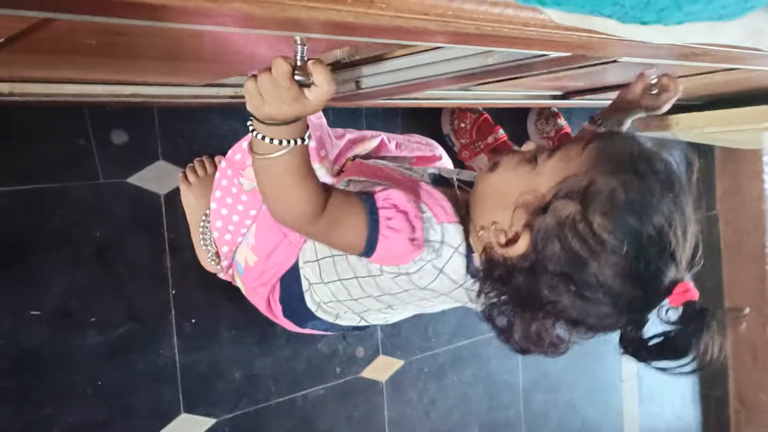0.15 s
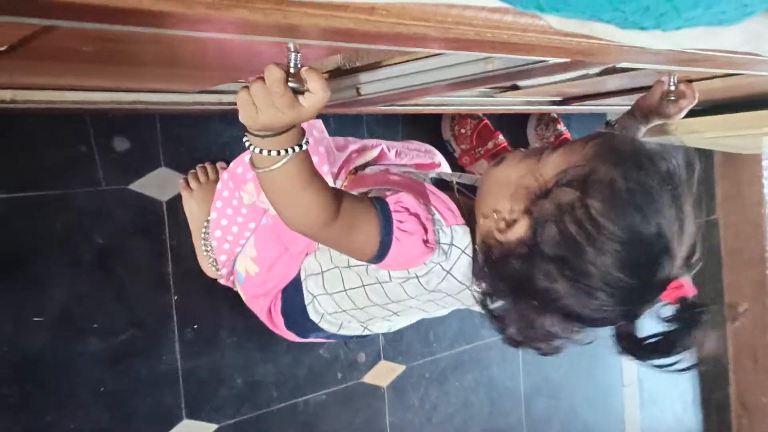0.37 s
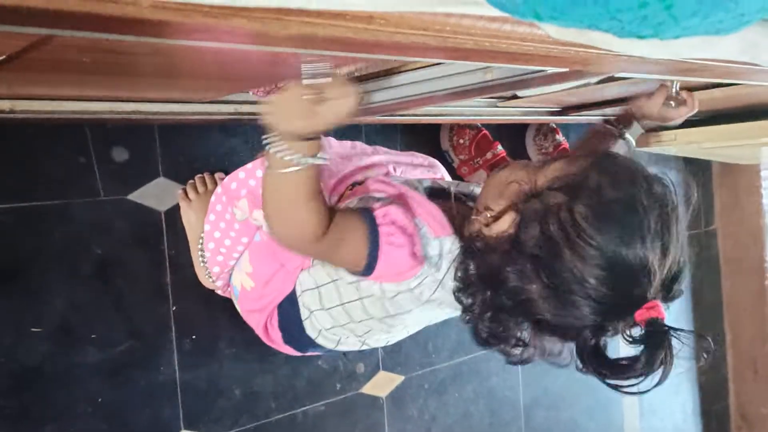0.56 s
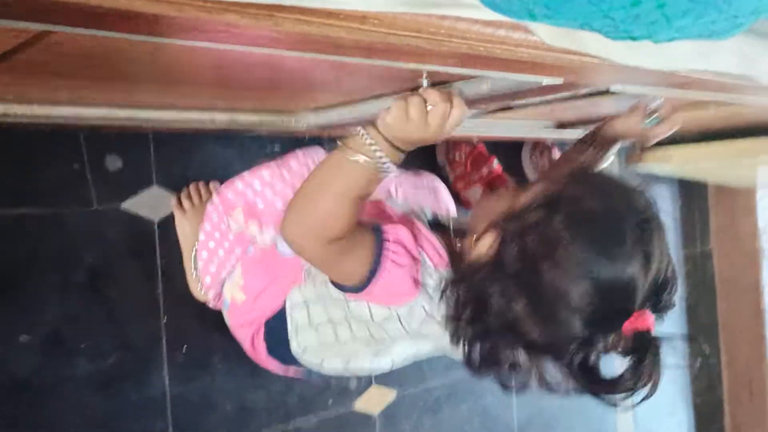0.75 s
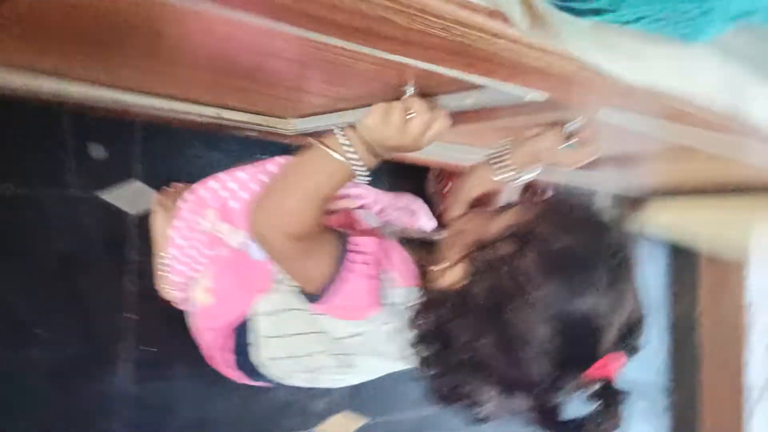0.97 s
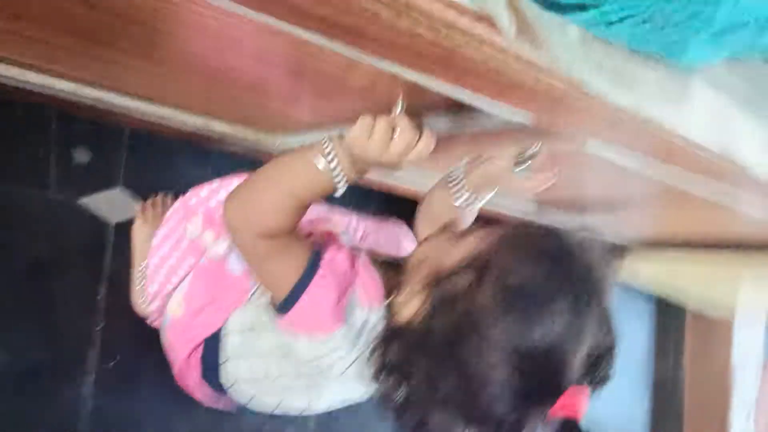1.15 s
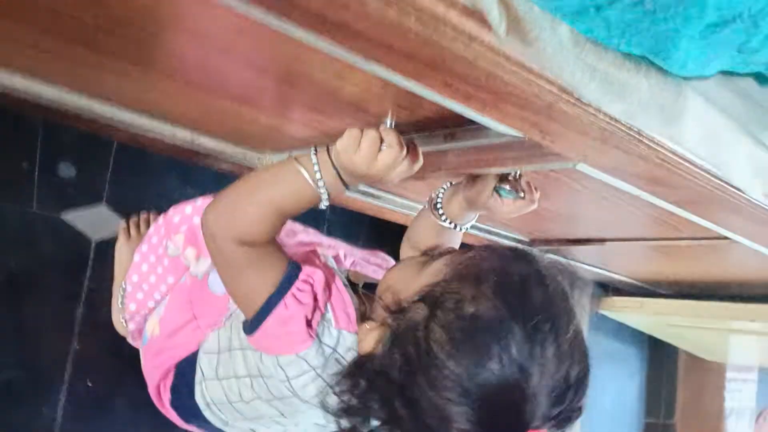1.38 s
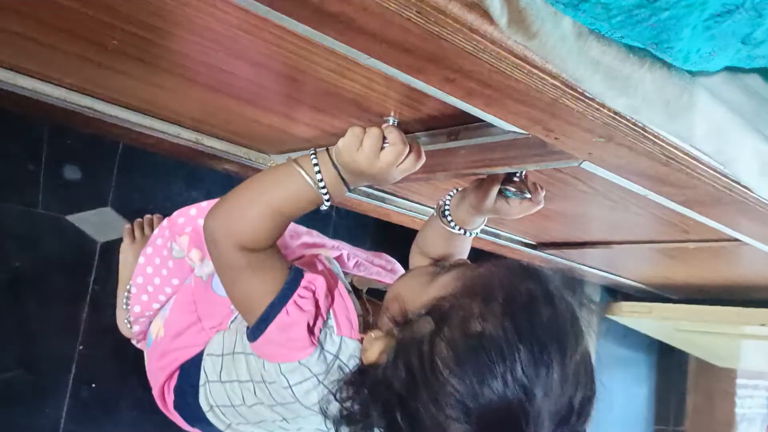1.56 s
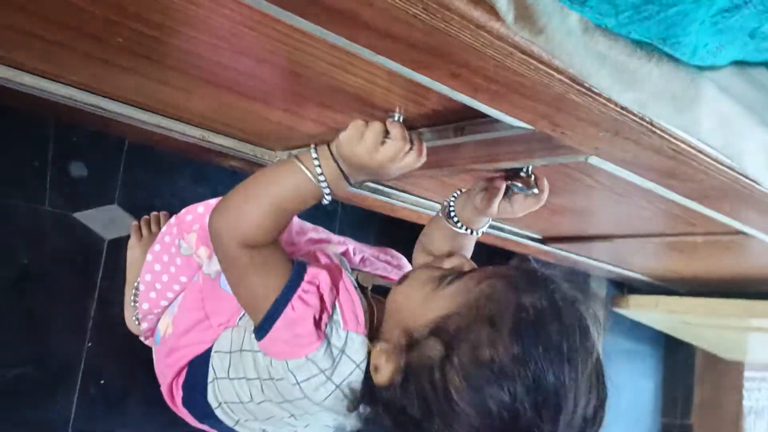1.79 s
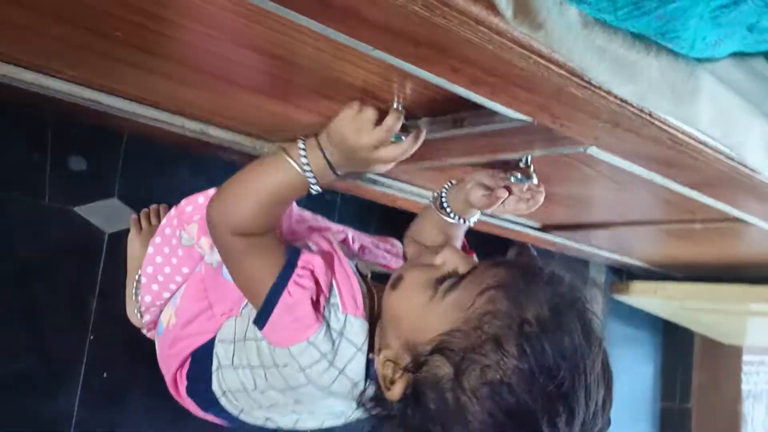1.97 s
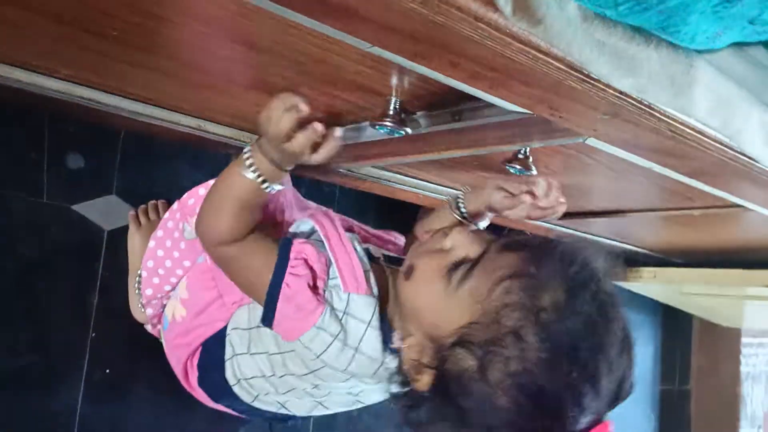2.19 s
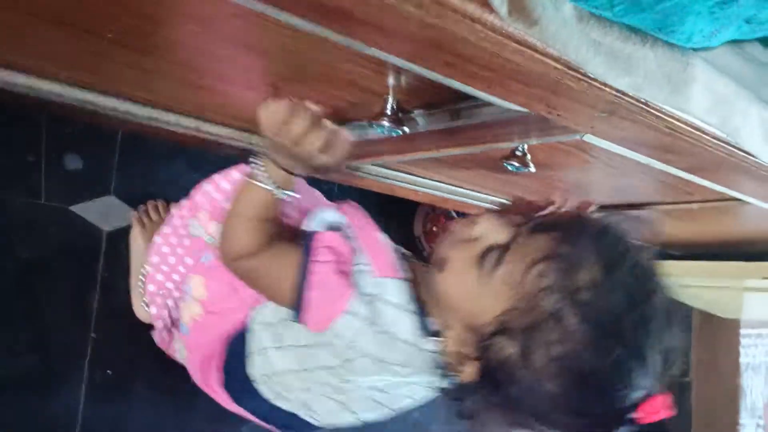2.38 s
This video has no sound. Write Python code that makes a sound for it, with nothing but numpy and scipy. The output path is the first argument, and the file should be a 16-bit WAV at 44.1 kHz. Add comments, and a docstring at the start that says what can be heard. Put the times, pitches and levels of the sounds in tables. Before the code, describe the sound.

Close stereo sound of a small wooden drawer being tugged: a low rumbling rub, a lull, a sudden gritty scrape and clack, a woody thud on the stop, then faint knocks and short tiled-room reverberation.

```python
"""A low rumble and a woody, sandy rasp: a wooden drawer is tugged to and fro in its runners in a tiled room.
Stick-slip friction noise drives the box's low modes, the wood's rasp, the grit and a hissing runner.
Short noise cracks mark catches in the slide; the front, a struck resonator, knocks lightly on its stop.
The cabinet's panels hum as narrow noise bands; cloth brushes softly in swells of hiss over a quiet room floor."""
import sys
import numpy as np
from scipy import signal
from scipy.fft import rfft, irfft, next_fast_len
from scipy.io import wavfile
from scipy.ndimage import map_coordinates

SR = 44100
rng = np.random.default_rng(int(sys.argv[2]) if len(sys.argv) > 2 else 0)


def inscribe(sig):
    """Save sig as 16-bit PCM at rate SR to the path in sys.argv[1].

    A 1-D sig is mono; a 2-D sig holds one channel per row.
    Samples are clipped to [-1, 1] before scaling.
    """
    pcm = np.round(np.clip(np.atleast_2d(sig).T, -1, 1) * 32767)
    wavfile.write(sys.argv[1], SR, pcm.astype(np.int16))


N = 107868
TIME = np.arange(N) / SR


def amp(db):
    """Decibel law: a level in dB as an amplitude ratio."""
    return 10 ** (np.asarray(db) / 20)


def unit(x):
    """Normalisation: the signal at rms 1."""
    return x / np.sqrt(np.mean(x ** 2) + 1e-20)


def along(points, hz):
    """Interpolation of (frequency_hz, value) points on a logarithmic frequency axis."""
    point_hz, value = np.transpose(points)
    return np.interp(np.log(hz + 1), np.log(point_hz + 1), value)


def wobble(rate):
    """Slow random modulation: a smooth curve through rate random knots a second."""
    knots = rng.standard_normal(int(N * rate / SR) + 4)
    return map_coordinates(knots, [TIME * rate])


def filtered(x, response):
    """Linear filtering: the spectrum times a complex response of frequency."""
    m = next_fast_len(x.shape[-1] + SR // 2)  # padding leaves room for the ringing
    spectrum = rfft(x, m) * response(np.fft.rfftfreq(m, 1 / SR))
    return irfft(spectrum, m)[..., :x.shape[-1]]


def peak(f, hz, width):
    """Resonance: the band-pass response of one damped mode."""
    return 1j * f * width / (hz * hz - f * f + 1j * f * width)


def modes(f, table, sign=-1):
    """Modal superposition: mode k is weighted by sign ** k, so rubbed modes alternate in polarity."""
    return sum(sign ** k * amp(db) * peak(f, hz, width) for k, (hz, width, db) in enumerate(table))


# Left-right correlation of the sound field: frequency_hz, correlation (-1 to 1)
LIKENESS = [(30, -0.6), (60, 0.96), (125, 0.97), (400, 0.87), (800, .6), (1400, .1), (3000, -.1),
            (12000, 0)]


def spread(pair, colour):
    """Interaural correlation: two signals, coloured and mixed as mid and side into stereo of rms 1."""
    def mid_side(hz):
        angle = np.arccos(np.clip(along(LIKENESS, hz), -1, 1)) / 2
        return colour(hz) * [np.cos(angle), np.sin(angle)]

    mid, side = filtered(pair, mid_side)
    return unit(np.array([mid + side, mid - side]))


SLIPS_PER_S, SLIP_SPREAD_DB = 500, 0.5


def friction(share):
    """Stick-slip: smooth rubbing noise, a share of it modulated by short irregular slips."""
    slips = (rng.random(N) < SLIPS_PER_S / SR) * amp(SLIP_SPREAD_DB * rng.exponential(size=N))
    bursts = unit(signal.lfilter([1], [1, -.97], slips))  # each slip dies within a few ms
    return rng.standard_normal((2, N)) * (1 - share + share * bursts)


# Levels of the rubbing layers: start_s, box_rumble_db, low_rasp_db, high_rasp_db, grit_db, fine_hiss_db,
# runner_ring_db
SLIDE = [(0.0, -24, -35, -31.5, -29.5, -37, -49.5), (0.034, -41.5, -36.5, -33, -32.5, -41, -45),
         (0.07, -32, -32.5, -36.5, -37, -42.5, -47), (0.146, -37.5, -51, -50, -50, -54.5, -61),
         (0.16, -39.5, -44.5, -53.5, -54.5, -60.5, -65), (0.196, -54, -51.5, -55.5, -59, -65, -70),
         (0.242, -47.5, -44, -48.5, -48, -58, -59), (0.282, -50.5, -52, -54, -55.5, -52.5, -67.5),
         (0.344, -49, -53, -52, -47, -52, -58.5), (0.356, -50, -44, -48.5, -48.5, -50.5, -57),
         (0.428, -45, -49.5, -50.5, -55.5, -54.5, -69), (0.486, -56.5, -58, -63.5, -56.5, -51, -60),
         (0.534, -65.5, -74, -70, -63.5, -58.5, -73), (0.592, -65, -64, -65.5, -64, -64, -75.5),
         (0.6, -32, -66.5, -60, -48, -55.5, -65), (0.616, -72, -57, -53, -54, -53.5, -58.5),
         (0.644, -31, -40.5, -42.5, -45.5, -45, -51), (0.67, -30, -39, -36, -35.5, -48.5, -42),
         (0.684, -32, -30, -35, -32, -42.5, -48.5), (0.756, -27, -30.5, -25.5, -28, -34, -42),
         (0.766, -32, -22.5, -21, -24.5, -24, -37), (0.784, -30.5, -29, -28.5, -38, -30.5, -38.5),
         (0.79, -24, -19, -22, -25.5, -34.5, -17), (0.8, -27, -40, -37.5, -27, -31, -30.5),
         (0.818, -27, -38, -31, -21, -24, -21), (0.916, -46, -46, -47.5, -42.5, -47, -43),
         (0.984, -44, -54.5, -50.5, -51, -55.5, -58), (1.052, -59.5, -64, -52.5, -45, -49, -56.5),
         (1.196, -53.5, -39, -43.5, -41.5, -44.5, -74.5), (1.225, -54, -63, -42, -38, -42, -62.5)]
# Modes of the drawer box, also struck by the knocks: pitch_hz, width_hz, relative level_db
BOX = [(137.2, 17, -16.5), (208, 22, 0.5), (250.3, 29, -5.5), (317.3, 41, -3.5), (407, 40, -5.5),
       (478, 130, -12), (572, 76, -11.5), (681.4, 25, -11.5), (790, 110, -8), (924, 190, -12),
       (1140, 380, -17), (1340, 130, -9), (1720, 92, -21.5), (1910, 840, -7), (2261, 320, 5.5),
       (3250, 730, -20.5)]
# Modes of the runner: pitch_hz, width_hz, relative level_db
RUNNER = [(4690, 96, -10), (5130, 130, -11.5), (5225, 300, -10.5), (5760, 130, -14)]
# Relative noise spectra of wood surface (low and high rasp), dust and fine hiss: frequency_hz, density_db (per Hz)
LOW_RASP = [(260, -33.5), (450, -7.5), (553, -8.5), (692, -9.5), (748, -6), (994, -15), (1100, -14),
            (1430, -44), (2420, -120)]
HIGH_RASP = [(650, -35.5), (1100, -8.5), (1340, -2.5), (1650, -5.5), (1730, -3), (2070, 0.5), (3200, -7.5),
             (4160, -34), (7040, -120)]
GRIT = [(1880, -25.5), (3200, -6.5), (3390, -8), (5010, -8.5), (5580, -8), (6190, -8.5), (7500, -12.5),
        (9750, -53.5), (16500, -120)]
HISS = [(4410, -41), (7500, -4.5), (8000, 2.5), (9550, 0), (10100, -5), (12000, -2), (15600, -15.5)]
STOP_FADE_DB_PER_S = 493  # after the last point
JUDDER_DB = 0.5  # unevenness shared by all layers
SLIP_SHARES = [.31, .31, .31, .4, .3, .4]  # in the order of the level columns


def slide():
    """Source-filter principle: friction heard through the box, the wood's surface, the dust and the runner."""
    def box_colour(hz):
        low_pass = 1 / (1 + (hz / 480) ** 6)
        high_pass = 1 / (1 + (160 / (hz + 1)) ** 6)
        return modes(hz, BOX) * low_pass * high_pass

    colours = [box_colour]
    colours += [lambda hz, p=p: amp(along(p, hz)) for p in (LOW_RASP, HIGH_RASP, GRIT, HISS)]
    colours += [lambda hz: modes(hz, RUNNER)]
    start_s, *levels_db = np.transpose(SLIDE)
    fade_db = -STOP_FADE_DB_PER_S * np.maximum(TIME - start_s[-1], 0)
    judder_db = JUDDER_DB * wobble(70.55)
    out = np.zeros((2, N))
    for level_db, colour, share in zip(levels_db, colours, SLIP_SHARES):
        envelope = amp(np.interp(TIME, start_s, level_db) + fade_db + judder_db)
        out += envelope * spread(friction(share), colour)
    return out


CRACK_WIDTH = 1.3  # bandwidth over centre, for snaps and knock clicks
SNAP_RISE_S = 0.0018
# Catches in the runner: start_s, peak level_db, centre_hz, t60_s
SNAPS = [(0.2327, -37.5, 3000, 0.0081), (0.346, -31, 8806, 0.011), (0.599, -30.5, 7900, 0.015),
         (0.6303, -28.5, 6847, 0.025), (0.664, -21, 4510, .012), (0.7652, -6.5, 2590, 0.033),
         (0.7897, -1.5, 4200, 0.014), (1.145, -31, 10000, 0.012)]


def snaps():
    """Sudden release: short band-passed noise cracks where the runner catches and lets go."""
    out, t = np.zeros((2, N + SR)), np.arange(SR // 10) / SR
    for start_s, level_db, centre_hz, t60_s in SNAPS:
        decay = amp(-60 * t / t60_s) * (1 - np.exp(-t / SNAP_RISE_S))
        crack = rng.standard_normal((2, len(t))) * decay
        crack = filtered(crack, lambda f: peak(f, centre_hz, centre_hz * CRACK_WIDTH) ** 2)
        out[:, round(start_s * SR):][:, :len(t)] += amp(level_db) * crack / np.abs(crack).max()
    return out[:, :N]


PUSH_S, RATTLE_T60_S, RATTLE_DB = .002, 0.17, -24.5
FRONT_T60_S, FRONT_RISE_S = 0.089, .002
CLICK_T60_S, CLICK_RISE_S = 0.08, .0005
REBOUND_S, REBOUND_DB = 0.017, -9.5  # the front touches once more
# Knocks on the stop: start_s, box ring peak level_db, low_cut_hz, high_cut_hz, click_db, click_hz,
# front board pitch_hz, front_db (click and front relative to the ring's peak, before their envelopes)
KNOCKS = [(1.2363, -16.5, 231, 930, -6, 2000, 324, -6), (1.624, -35.5, 150, 690, -14.5, 1363, 378.4, -6),
          (2.0164, -35, 241, 870, -6.5, 2860, 342, -2.5), (2.1744, -46.5, 220, 600, -16, 1700, 335, -2.5),
          (2.2797, -45.5, 215, 586, -20, 1800, 344.5, -0.5), (2.436, -71.5, 100, 299, -35, 1800, 299, -10)]


def knocks():
    """Impact excitation: a push and a dying rattle ring the box, with a front-board tone and a click."""
    out, t = np.zeros((2, N + SR)), np.arange(SR // 2) / SR
    for start_s, level_db, low_hz, high_hz, click_db, click_hz, front_hz, front_db in KNOCKS:
        noise = rng.standard_normal((4, len(t)))
        push = 0.46 * noise[0] * (t / PUSH_S) * np.exp(-t / PUSH_S)
        rattle = amp(RATTLE_DB - 60 * t / RATTLE_T60_S) * noise[1]

        def struck_box(f):
            high_pass = 1 / (1 + (low_hz / (f + 1)) ** 3)
            low_pass = 1 / (1 + (f / high_hz) ** 3)  # softer contacts leave out the high modes
            return modes(f, BOX, sign=0.96) * high_pass * low_pass  # struck modes start in step

        ring = filtered(push + rattle, struck_box)
        front_envelope = amp(front_db - 60 * t / FRONT_T60_S) * (1 - np.exp(-t / FRONT_RISE_S))
        front = front_envelope * np.sin(2 * np.pi * front_hz * t)
        body = ring / np.abs(ring).max() + front
        click = amp(click_db - 60 * t / CLICK_T60_S) * (1 - np.exp(-t / CLICK_RISE_S)) * noise[2:]
        click = filtered(click, lambda f: peak(f, click_hz, click_hz * CRACK_WIDTH) ** 2)
        out[:, round(start_s * SR):][:, :len(t)] += amp(level_db) * (body + click)
        rebound_s = start_s + REBOUND_S
        out[:, round(rebound_s * SR):][:, :len(t)] += amp(level_db + REBOUND_DB) * body
    return out[:, :N]


# Levels of the cabinet's panels: start_s, lowest_db, middle_db, upper_db
DRUM = [(0.0, -49, -30.5, -30), (0.09, -37, -38.5, -36.5), (0.18, -46, -45, -38), (0.24, -43.5, -52, -52),
        (0.3, -57, -52, -68), (0.35, -49, -43, -40), (0.39, -39, -45, -43), (0.44, -49, -48, -46),
        (0.53, -69, -81, -66), (0.58, -70, -75, -76), (0.63, -45, -31.5, -34), (0.69, -44, -43, -55),
        (0.71, -34.5, -51, -50), (0.81, -35, -25, -72), (0.83, -36.5, -36, -45), (0.87, -53, -30, -37.5),
        (0.92, -77, -37, -46), (0.98, -42.5, -48, -75), (1.07, -66, -63, -69), (1.12, -49.5, -53, -53),
        (1.16, -58, -62, -65), (1.2, -60, -72, -85), (1.24, -57, -40, -40), (1.26, -38, -41.5, -32),
        (1.49, -72, -82.5, -74.5), (1.58, -73, -80, -66), (1.64, -40, -48, -59), (1.67, -64, -51, -50),
        (1.81, -70, -90, -86), (1.96, -71, -78.5, -81), (2.03, -54, -57, -60.5), (2.12, -72, -62.5, -75),
        (2.19, -65, -74, -69), (2.44, -72.5, -73, -78.5)]
# Panel resonances, lowest first: pitch_hz, width_hz
PANELS = [(72, 35), (126, 26), (251, 18)]


def drumming():
    """Panel resonance: noise through each big cabinet panel's mode hums as a narrow band."""
    start_s, *levels_db = np.transpose(DRUM)
    out = np.zeros((2, N))
    for level_db, (hz, width) in zip(levels_db, PANELS):
        hum = spread(rng.standard_normal((2, N)), lambda f: peak(f, hz, width) * peak(f, hz, 3 * width))
        out += amp(np.interp(TIME, start_s, level_db)) * hum
    return out


# Cloth brushing: middle_s, half_length_s, level_db, centre_hz, width_hz
BRUSHES = [(1.426, 0.076, -46.5, 9270, 30000), (1.623, 0.02, -61.5, 5660, 5900),
           (2.218, 0.14, -64.5, 7990, 4900)]
# Relative noise spectrum of cloth: frequency_hz, density_db (per Hz)
CLOTH = [(880, -54), (1500, -30), (2220, -13), (3040, -14), (5800, -11.5), (7850, -12.5), (12600, -10.5),
         (15600, -13)]


def cloth():
    """Fibre friction: soft bell-shaped swells of fine hiss."""
    out = np.zeros((2, N))
    for middle_s, half_s, level_db, hz, width in BRUSHES:
        swell = amp(level_db + 0.5 * wobble(30)) * np.exp(-((TIME - middle_s) / half_s) ** 2)
        out += swell * spread(friction(.1), lambda f: amp(along(CLOTH, f)) * peak(f, hz, width))
    return out


FLOOR_DB = -69.5
# Relative noise spectrum of the quiet room: frequency_hz, density_db (per Hz)
FLOOR = [(88, -57), (150, -12.5), (374, -8.5), (608, -12.5), (932, -16.5), (1350, -17), (1460, -17.5),
         (1610, -18.5), (2510, -16), (6380, -26.5), (15600, -24)]


def room_floor():
    """Ambient noise: steady coloured noise whose level drifts slightly."""
    hush = spread(rng.standard_normal((2, N)), lambda hz: amp(along(FLOOR, hz)))
    return amp(FLOOR_DB + 1.5 * wobble(5)) * hush


HITS_ROOM_DB, SLIDE_ROOM_DB = -4.5, -13.5  # sent to the room
# Reverberation of the tiled walls: frequency_hz, t60_s
ROOM = [(150, 0.3), (1000, 0.26), (5000, .25), (12000, 0.094)]


def room(x):
    """Diffuse reverberation: convolution with noise in which each frequency dies at its own speed."""
    hz, t, bands = signal.stft(rng.standard_normal((2, SR // 2)), SR, nperseg=256)
    decay = amp(-60 * t / along(ROOM, hz)[:, None])
    tail = signal.istft(bands * decay, SR, nperseg=256)[1]
    delayed = np.pad(x, ((0, 0), (200, 0)))  # 200 samples before the first reflection
    return signal.fftconvolve(delayed, tail / np.linalg.norm(tail[0]), axes=1)[:, :N]


def scene():
    """Superposition: direct sound, its reverberation, and the quieter sources."""
    hits, rub = snaps() + knocks(), slide()
    reverb = room(amp(HITS_ROOM_DB) * hits + amp(SLIDE_ROOM_DB) * rub)
    return rub + hits + reverb + drumming() + cloth() + room_floor()


TOP_HZ = 15740


def record(dry):
    """Band limiting: nothing is kept at or above the top frequency."""
    return filtered(dry, lambda hz: hz < TOP_HZ)


dry = scene()
out = record(dry)
inscribe(out)
```